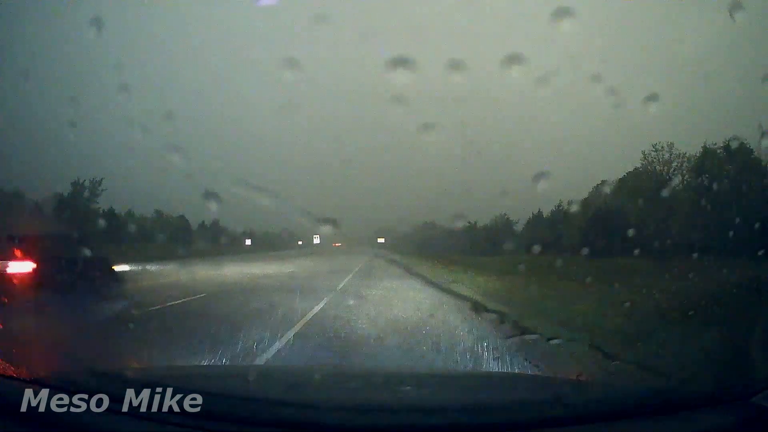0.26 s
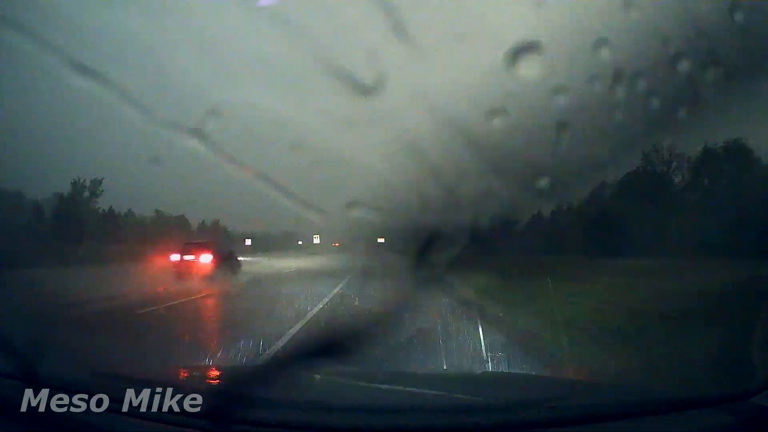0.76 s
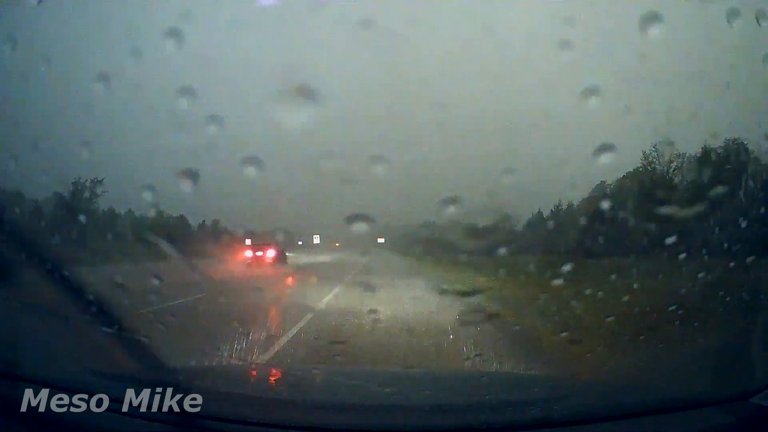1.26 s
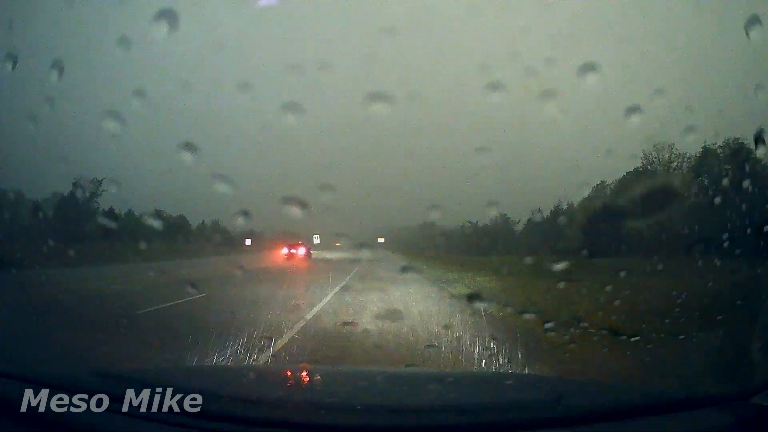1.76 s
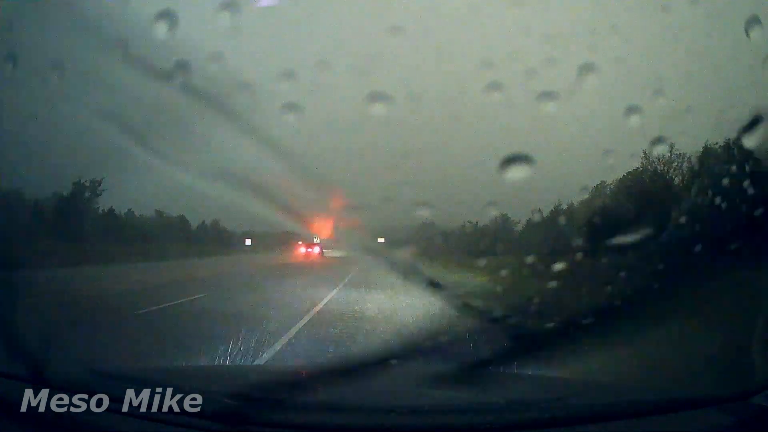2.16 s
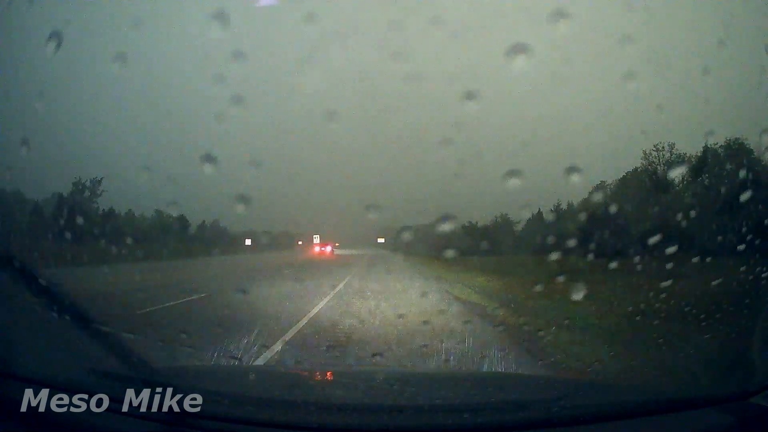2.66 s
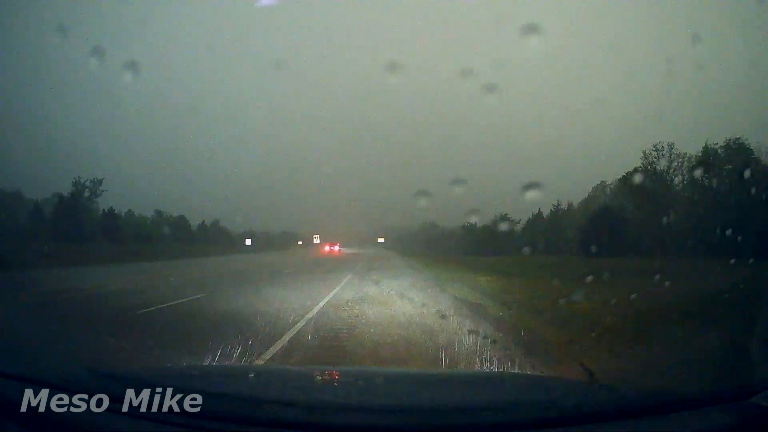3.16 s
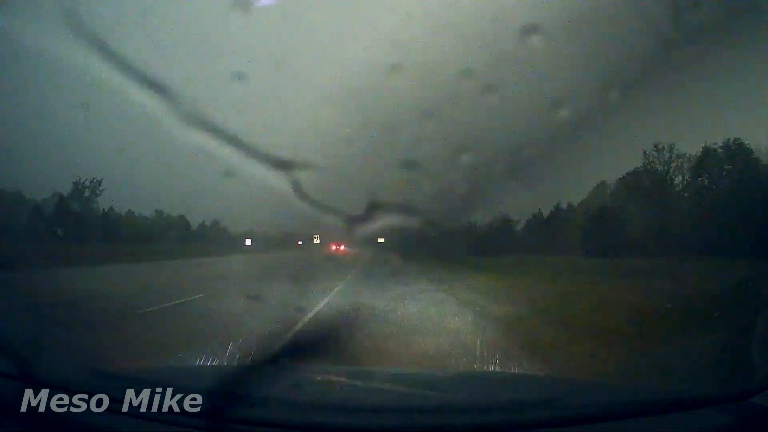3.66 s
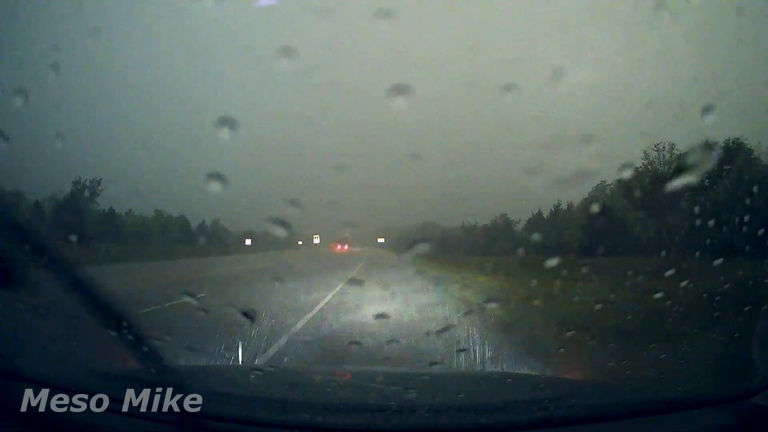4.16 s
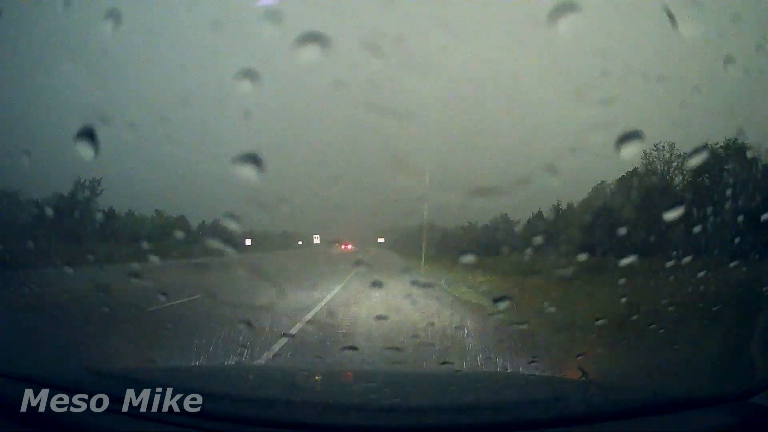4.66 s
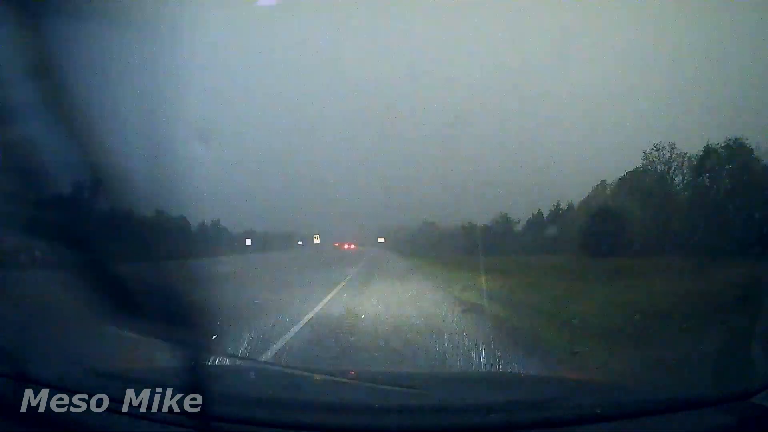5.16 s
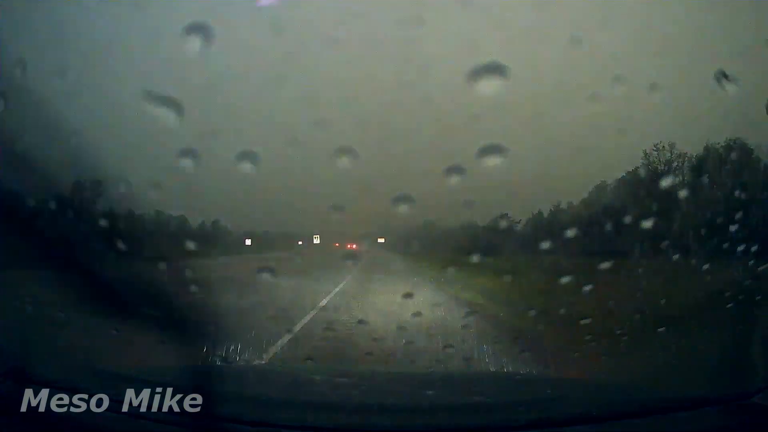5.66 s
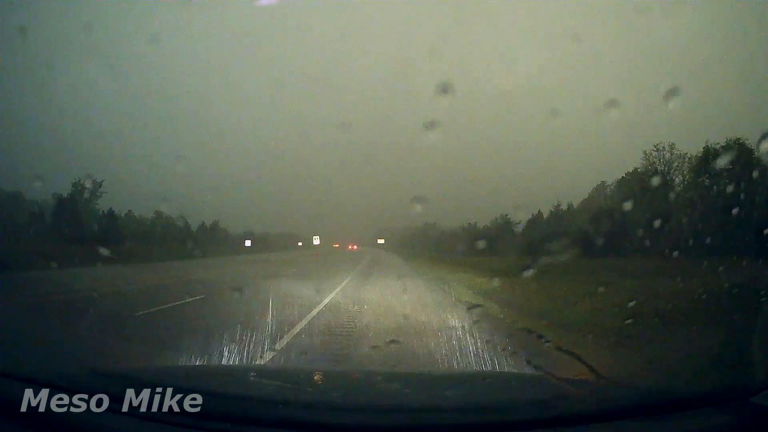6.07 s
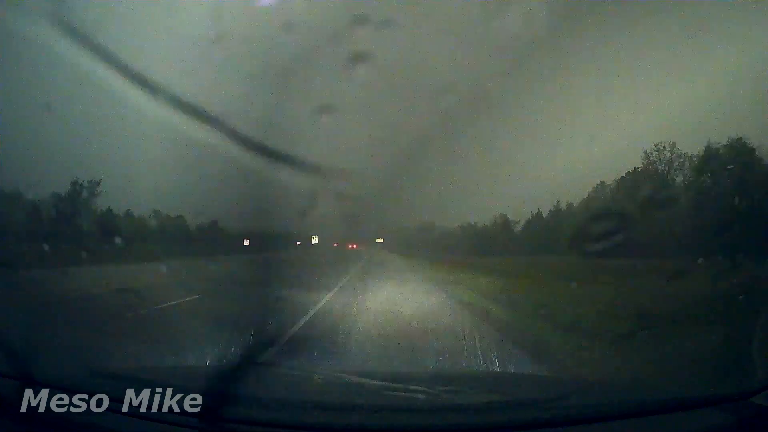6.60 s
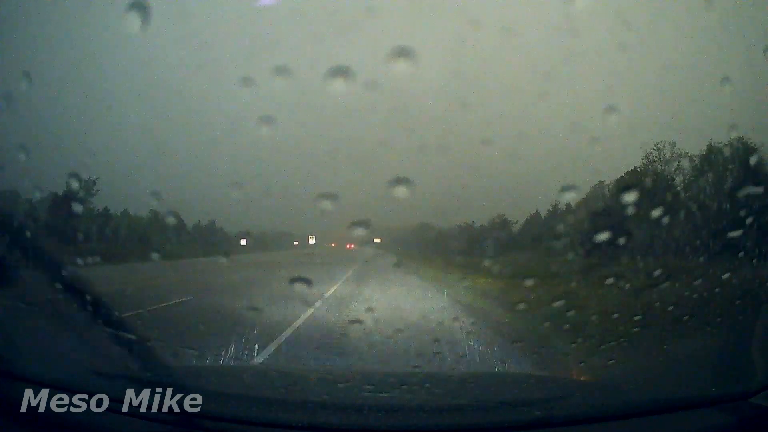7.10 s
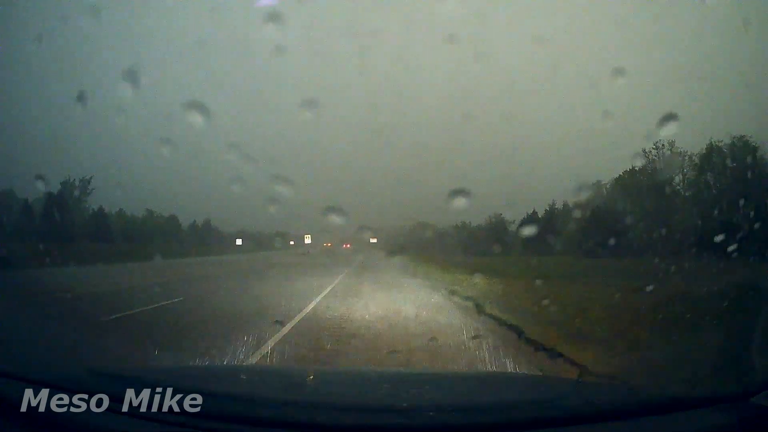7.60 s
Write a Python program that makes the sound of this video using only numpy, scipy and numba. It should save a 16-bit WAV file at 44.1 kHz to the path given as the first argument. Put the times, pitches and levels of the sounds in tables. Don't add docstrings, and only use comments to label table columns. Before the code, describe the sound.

Inside a slowly moving car in a storm, dense rain drums continuously on roof and windshield, swelling in short gusts. A low tyre rumble and faint engine throb lie underneath, and wipers thud softly about every 0.7 seconds. Hail knocks early, around 0.2-0.3 s, then a bright double crack lands near 0.86 and another hard hit at 1.05. Lighter stones and fat drops tap until about 2.6-3.2, when medium knocks return. Very loud cracks strike at 3.64 and 3.76, followed by a deep roof boom at 4.04 and a dense rattling cluster from 4.2 to 4.5. It thins to patter and smaller ticks around 5-6. The engine rises slightly near 6.0-6.6, then drops. A quick clustered hit comes at 6.3, with further knocks from 6.8 to 7.6. The cheap dashboard microphone sounds boxy and muffled, with little high treble, and the hardest impacts crunch into distortion.

```python
import sys
import numpy as np
from scipy import signal
from scipy.fft import rfft, irfft
from scipy.io import wavfile
from scipy.ndimage import uniform_filter1d
from numba import njit

SR = 44100
rng = np.random.default_rng(int(sys.argv[2]) if len(sys.argv) > 2 else 0)


def persist_wave(psi):
    counts = np.round(np.clip(psi, -1, 1) * 32767).astype(np.int16)
    wavfile.write(sys.argv[1], SR, np.atleast_2d(counts).T)


def rack_gain(trim_db):
    fader = np.asarray(trim_db, float)
    return 10 ** (fader / 20)


N = 345744
TIME = np.arange(N) / SR
BLOW_SIZE, THUD_SIZE = 8192, 16384
CABIN_HZ = 195.8


def level(x, db):
    return x * rack_gain(db) / np.sqrt(np.mean(x ** 2))


def colour_db(table, hz):
    table = np.array(table, float)
    return np.interp(np.log(hz), np.log(table[:, 0]), table[:, 1])


def bins_hz(size):
    return np.maximum(np.arange(size // 2 + 1) * SR / size, 1)


def walk(rate_hz):
    hold = int(SR / rate_hz)
    steps = np.repeat(rng.standard_normal(N // hold + 1), hold)
    return 1.2 * uniform_filter1d(uniform_filter1d(steps, hold), hold)[:N]


@njit
def ring(hz, gain, t60, rise, phase, size):
    out = np.zeros(size)
    for m in range(len(hz)):
        turn = np.exp(2j * np.pi * hz[m] / SR - np.log(1000) / (t60[m] * SR))
        z = gain[m] * np.exp(1j * phase[m])
        wait, fade = 1., np.exp(-1 / (rise[m] * SR))
        for i in range(size):
            out[i] += z.imag * (1 - wait) ** 2
            z, wait = z * turn, wait * fade
    return out


# pitch_hz [Hz], level_db [dB per Hz]
PANEL_RESPONSE = [(88, -39.5), (150, -3.5), (231, -13.5), (304, -0.5), (379, -5.5), (432, -3), (554, -1),
                  (808, -3), (1310, -20), (1620, -15.5), (1910, -7.5), (2240, -14), (2950, -16),
                  (3190, -14.5), (3400, -17), (4420, -52), (7480, -120)]


def blow(chance, treble_db, bass_db, centre_hz, t60):
    mode_step_hz, panel_top_hz = 70, 3300
    hz = mode_step_hz * (2.322 + np.arange(len(chance[0])) + 0.94 * chance[0])
    hz[0] = CABIN_HZ
    panel_db = colour_db(PANEL_RESPONSE, np.minimum(hz, panel_top_hz))
    boom_db = 4.38 * np.exp(-(np.log(hz / centre_hz) / 0.18) ** 2)
    split_db = np.interp(hz, [353, 446, 1120, 1730], [bass_db, 0, 0, treble_db])
    spot_db = 6.9 * (chance[1] - .5)
    gain = rack_gain(panel_db + boom_db + split_db + spot_db)
    decay = np.clip(t60, .02, .3) * (hz / 600) ** -.22 * (0.62 + 0.43 * chance[2])
    rise = 0.00085 * (hz / 600) ** -.9
    return ring(hz, gain, decay, rise, 2 * np.pi * chance[3], BLOW_SIZE)


# start_s [s], patter_db [dB], treble_db [dB]
RAIN_GUSTS = [(0.0, -24, -0.5), (0.59, -19.5, -2), (1.05, -24.5, -3), (1.26, -24, 2), (1.55, -18.5, -4),
              (1.801, -23, -2), (2.36, -25.5, -1), (3.362, -25.5, -5.5), (3.86, -20.5, -2.5),
              (4.26, -25.5, -3), (4.778, -19.5, -1.5), (5.001, -24.5, -2), (5.76, -23, -3),
              (6.099, -25, -1), (6.79, -20.5, -2), (7.1, -25.5, -2), (7.489, -23.5, -2), (7.84, -24, -0.5)]


def rain(per_s=900, scatter_db=3.0):
    start_s, patter_db, treble_db = np.transpose(RAIN_GUSTS)
    patter = 0
    for spot in range(12):
        chance = rng.random((3, N))
        lands = chance[0] < per_s / 12 / SR
        size = rack_gain(np.minimum(-scatter_db * np.log(chance[1]), 13))
        drops = lands * size * np.sign(chance[2] - .5)
        c = rng.random((4, 66))
        body = blow(c, 0.16, 0.27, 350 + 600 * c[0, 0], 0.093)
        body = body / np.sqrt(np.sum(body ** 2))
        patter = patter + rack_gain(1.9 * walk(14)) * signal.fftconvolve(drops, body)[:N]
    low = signal.sosfiltfilt(signal.butter(2, 1300, fs=SR, output="sos"), patter)
    mix = low + (patter - low) * rack_gain(np.interp(TIME, start_s, treble_db))
    return level(mix, 0.6) * rack_gain(np.interp(TIME, start_s, patter_db) + 1.2 * walk(9))


# start_s [s], peak_db [dB], treble_db [dB], boom_hz [Hz], ring_s [s]
GLASS_HAIL = [(0.174, -5, -8.5, 630, 0.045), (0.267, -0.3, -15, 766, 0.089), (1.049, 1.5, -6, 406, 0.084),
              (2.631, -4, -13.5, 420, 0.13), (2.728, -5.5, -13.5, 560, 0.13), (3.155, -1, -7.5, 765, 0.075),
              (3.637, 8, -17.5, 758, 0.088), (4.194, 6.5, -16, 442, 0.066), (4.289, 5.5, -15, 713, 0.14),
              (4.38, 0.2, -16.5, 609, 0.053), (4.46, 5.5, -10, 675, 0.075),
              (5.439, -3.5, -15.5, 413, 0.042), (6.3, 2, -17, 769, 0.065), (6.773, -3.5, -22.5, 713, 0.049),
              (6.94, -0.6, -18.5, 548, 0.055), (7.23, -1.5, -16, 563, 0.099), (7.477, 1, -13, 704, 0.1)]
# start_s [s], peak_db [dB], treble_db [dB], boom_hz [Hz], ring_s [s]
ROOF_STONES = [
    (0.857, 5, -6, 567, 0.11),
    (1.26, -1, -11, 550, 0.1),
    (1.849, -3, -7.5, 650, 0.1),
    (2.929, -1, -9.5, 622, 0.062),
    (3.76, 3.5, -11.5, 730, 0.075),
    (4.039, 5, -12, 558, 0.096),
    (5.864, -4.5, -16, 780, 0.041),
]
# start_s [s], peak_db [dB], treble_db [dB], boom_hz [Hz]
BOUNCING_STONES = [(0.868, 2.5, -7, 720), (1.075, -9, -29.5, 773), (2.073, -11, -22, 585),
                   (4.202, -6, -17.5, 523), (4.3, 0.5, -20, 660), (4.311, -4.5, -25.5, 700),
                   (4.325, -6, -31, 533), (4.467, -3.5, -16, 343), (6.333, -4.5, -5, 697),
                   (6.344, -7, -11.5, 710), (7.25, -4, -11.5, 560), (7.276, -5.5, -15, 547)]
# start_s [s], peak_db [dB], treble_db [dB], boom_hz [Hz]
SLUSHY_STONES = [(0.004, -13, -19, 407), (0.071, -11, -8.5, 614), (0.128, -11, -25.5, 451),
                 (0.32, -6, -18, 544), (0.407, -11, -16.5, 673), (0.623, -10.5, -15, 444),
                 (0.661, -7.5, -21, 493), (0.845, -11.5, -9, 532), (1.014, -9.5, -15.5, 358),
                 (1.122, -9, -9.5, 436), (1.368, -10.5, -5, 673), (1.417, -5.5, -16.5, 661),
                 (1.551, -12, -9.5, 610), (1.701, -7.5, -17.5, 358), (1.992, -10, -14.5, 587),
                 (2.67, -6, -10.5, 668), (3.289, -10, -14.5, 407), (3.682, -8.5, -13.5, 740),
                 (3.966, -5.5, -19, 734), (4.007, -10.5, -18, 540), (4.579, -9, -13, 634),
                 (4.833, -10, -22, 770), (4.893, -9, -25, 480), (5.648, -6.5, -24.5, 571),
                 (5.735, -11, -14, 441), (5.849, -13.5, -8, 825), (6.154, -12, -21.5, 579),
                 (7.09, -9.5, -10.5, 557), (7.578, -4.5, -19.5, 441), (7.73, -8, 7.5, 610)]
# start_s [s], peak_db [dB], treble_db [dB]
FAT_DROPS = [(0.12, -13.5, -10), (0.391, -18, -1), (0.584, -16, -28), (0.921, -14.5, -16),
             (0.984, -11.5, -11.5), (1.214, -21, -0.5), (1.722, -11, -21), (2.056, -14, -11),
             (2.256, -14, -22), (3.069, -16.5, -17), (3.241, -13, -12), (3.411, -21, -5),
             (3.588, -14, -24.5), (3.81, -13.5, -22), (4.268, -17.5, -14), (4.956, -15.5, -23),
             (5.367, -22.5, -8), (5.553, -14, -13.5), (5.888, -21, -12), (6.102, -16, 2), (6.27, -12, -20),
             (6.882, -12.5, -29), (7.013, -18, -18.5), (7.409, -16.5, -18.5), (7.458, -19.5, -13.5),
             (2.719, -8.5, -8.5), (4.77, -13.5, -9), (5.14, -17, -4), (5.26, -16.5, -4),
             (7.263, -8.5, -13.5)]


def hail():
    bounce_ring_s, slush_ring_s, drop_ring_s, drop_boom_hz = 0.098, 0.14, 0.11, 590
    roof_db = 10.5
    stones = [(*b, 0) for b in GLASS_HAIL]
    stones += [(*b, roof_db) for b in ROOF_STONES]
    stones += [(*b, bounce_ring_s, roof_db / 2) for b in BOUNCING_STONES]
    stones += [(*b, slush_ring_s, 0) for b in SLUSHY_STONES]
    stones += [(*b, drop_boom_hz, drop_ring_s, roof_db / 2) for b in FAT_DROPS]
    front = rack_gain(4 * np.exp(-(TIME[:BLOW_SIZE] / 0.007) ** 2))
    out = np.zeros(N + BLOW_SIZE)
    chance = rng.random((len(stones), 5, 66))
    for (start_s, peak_db, treble_db, boom_hz, ring_s, deep_db), c in zip(stones, chance):
        bass_db = -4.5 + deep_db - 4.5 * np.log2(boom_hz / 600) + 5 * (c[4, 0] - .5)
        stone = front * blow(c, treble_db + 13, bass_db, boom_hz, 1.174 * ring_s)
        i = int((start_s - .0004) * SR)
        out[i:i + BLOW_SIZE] += stone * rack_gain(peak_db - 6.5) / np.std(stone[:400])
    return out[:N]


# start_s [s], firing_hz [Hz], level_db [dB]
ENGINE_RUN = [(0.15, 23.42, -33), (0.7, 23.33, -36), (1.8, 23.55, -37), (2.28, 23.45, -34),
              (3.5, 23.59, -33.5), (3.91, 23.35, -34.5), (4.23, 23.58, -28.5), (5.76, 23.3, -27.5),
              (5.902, 23.5, -35), (6.0, 33.4, -43), (6.07, 33.35, -29), (6.152, 35.5, -31),
              (6.522, 35.74, -30), (6.6, 36.25, -39), (6.722, 29.2, -34), (6.942, 28.63, -42.5),
              (7.198, 28, -31), (7.84, 27.8, -35.5)]


def engine():
    start_s, firing_hz, level_db = np.transpose(ENGINE_RUN)
    hz = np.interp(TIME, start_s, firing_hz)
    throb_db = np.interp(TIME, start_s, level_db)
    turn = 2 * np.pi * np.cumsum(hz * (1 + 0.022 * walk(8.6))) / SR
    octave_db = -8 + 3 * walk(2.4) - 2 * np.maximum(hz - 25, 0)
    throb = np.sqrt(2) * (np.sin(turn) + rack_gain(octave_db) * np.sin(2 * turn))
    return throb * rack_gain(throb_db + 1.5 * walk(13))


# start_s [s], swell_db [dB]
ROAD_JOINTS = [
    (0.05, 10),
    (0.87, 6.5),
    (1.3, 4.5),
    (1.6, 5),
    (3.3, 7.5),
    (4.04, 7),
    (4.32, 6),
    (5.04, 3.5),
    (5.92, 4),
]


def swells():
    rise_s, fall_s, joint_s = 0.11, 0.097, 0.052
    db = -34.5 + 2.4 * walk(14)
    for start_s, *_ in WIPER_TURNS:
        width_s = np.where(TIME < start_s, rise_s, fall_s)
        db = db + 6.5 * np.exp(-((TIME - start_s) / width_s) ** 2)
    for start_s, swell_db in ROAD_JOINTS:
        db = db + swell_db * np.exp(-((TIME - start_s) / joint_s) ** 2)
    return db


# pitch_hz [Hz], level_db [dB per Hz]
RUMBLE_SPECTRUM = [(12, -27.5), (20, -4), (45, -1.5), (92, -7), (152, -3), (231, -12.5), (260, -9),
                   (340, -33.5), (570, -120)]


def rumble():
    hz = bins_hz(N)
    cabin_db = 4.5 * np.exp(-((hz - CABIN_HZ) / 12) ** 2)
    noise = rfft(rng.standard_normal(N))
    coloured = irfft(noise * rack_gain(colour_db(RUMBLE_SPECTRUM, hz) + cabin_db), N)
    return level(coloured, 0.22) * rack_gain(swells())


# start_s [s], peak_db [dB], pitch_hz [Hz]
WIPER_TURNS = [(0.679, -19, 48.6), (1.421, -17, 152.6), (2.149, -22, 40.4), (2.88, -25.5, 48.7),
               (3.637, -22.5, 48.3), (4.369, -20, 40.4), (5.049, -23, 40.4), (5.751, -19, 40.3),
               (5.889, -16, 164), (6.469, -25, 40.4), (7.232, -16.5, 56.5)]


def wipers():
    out = np.zeros(N + THUD_SIZE)
    gain = rack_gain(np.array([-2., 0.]))
    t60, rise = np.array([.35, .3]), np.array([.015, .008])
    for (start_s, peak_db, pitch_hz), chance in zip(WIPER_TURNS, rng.random((len(WIPER_TURNS), 2))):
        thud = ring(np.array([50., pitch_hz]), gain, t60, rise, 2 * np.pi * chance, THUD_SIZE)
        i = int((start_s - .01) * SR)
        out[i:i + THUD_SIZE] += thud * rack_gain(peak_db - 3.0) / np.abs(thud).max()
    return out[:N]


def scene():
    return (rain() + hail() + engine() + rumble() + wipers())[None]


def roll_off(x):
    return signal.sosfilt(signal.butter(12, 16200, fs=SR, output="sos"), x)


# pitch_hz [Hz], level_db [dB]
MIC_RESPONSE = [(3300, -1.5), (3600, -9.5), (4000, -17.5), (4250, -28), (4500, -44), (4600, -51.5),
                (4700, -78.5), (5600, -93)]


def record(dry):
    first = np.pad(np.clip(dry, -.85, .85), ((0, 0), (512, 512)), "reflect")
    size = first.shape[1]
    hz = bins_hz(size)
    heard = rfft(first) * rack_gain(colour_db(MIC_RESPONSE, hz))
    share = np.clip((hz - 3800) / 300 + .5, 0, 1)
    body, edge = (irfft(heard * w, size)[:, 512:-512] for w in (1 - share, share))
    dull = body + edge * rack_gain(3.5 * walk(22))
    hiss = level(rng.standard_normal(N), -99)
    ceiling, knee = 0.71, 0.041
    over = np.maximum(np.abs(dull) - ceiling + knee, 0)
    bent = dull - np.sign(dull) * (over - knee * np.tanh(over / knee))
    return roll_off(bent + hiss)


dry = scene()
out = record(dry)
persist_wave(out)
```